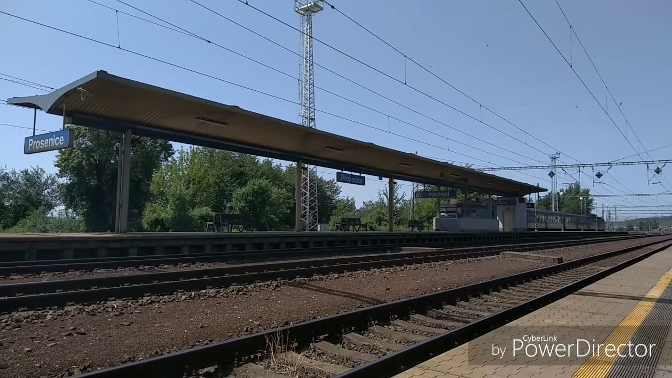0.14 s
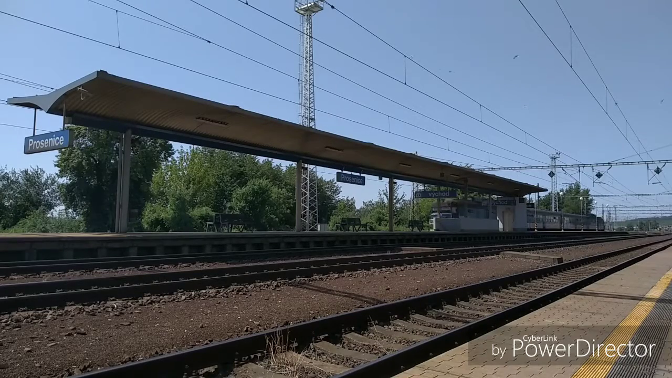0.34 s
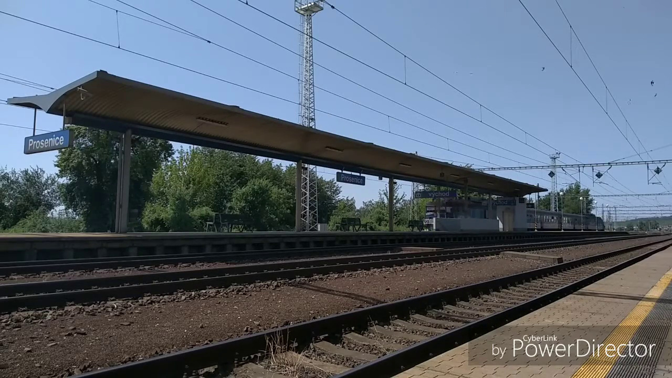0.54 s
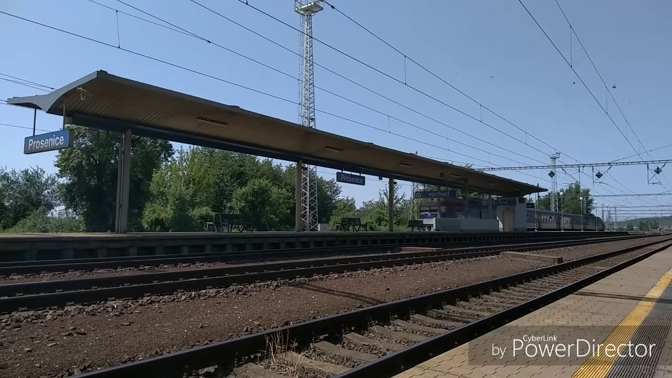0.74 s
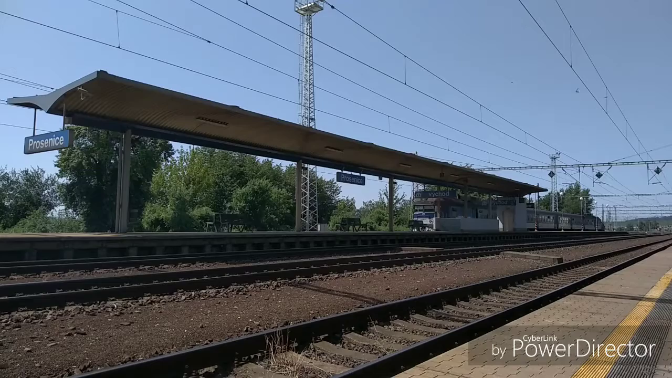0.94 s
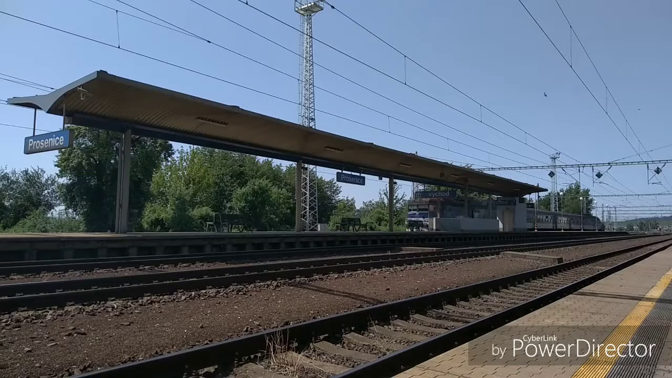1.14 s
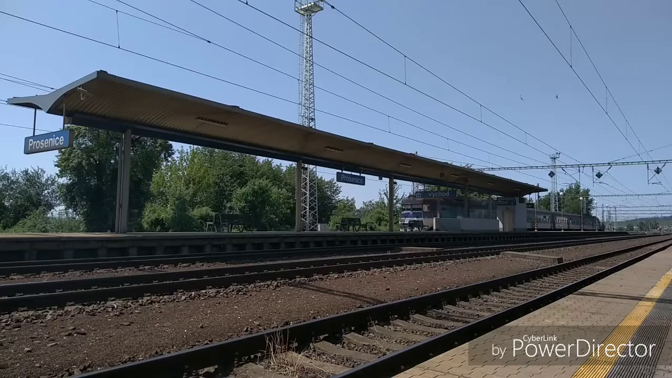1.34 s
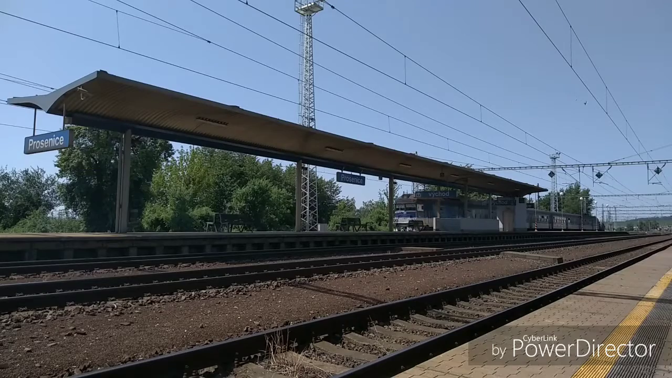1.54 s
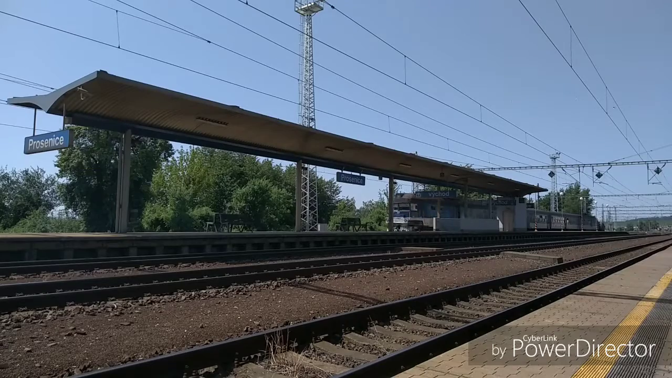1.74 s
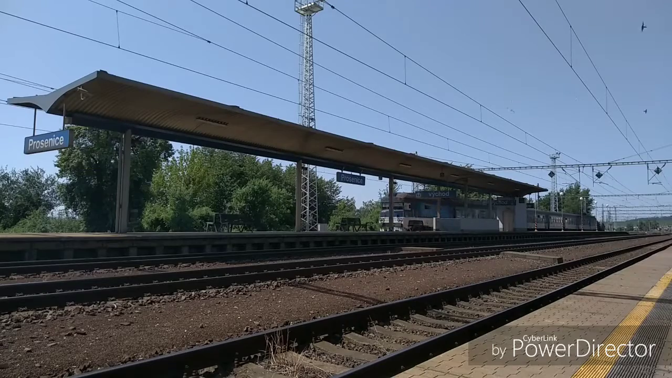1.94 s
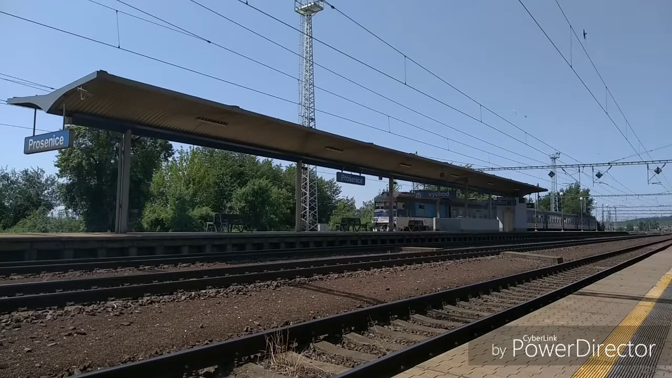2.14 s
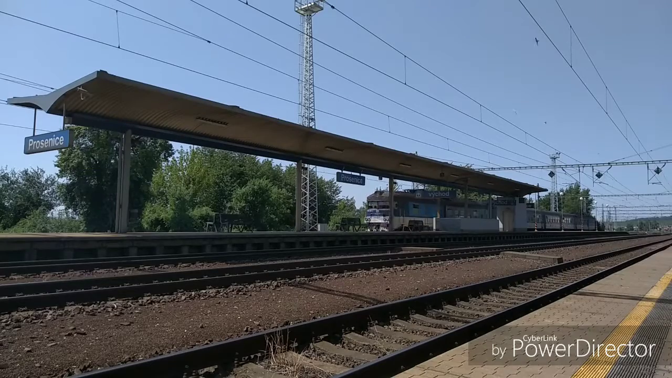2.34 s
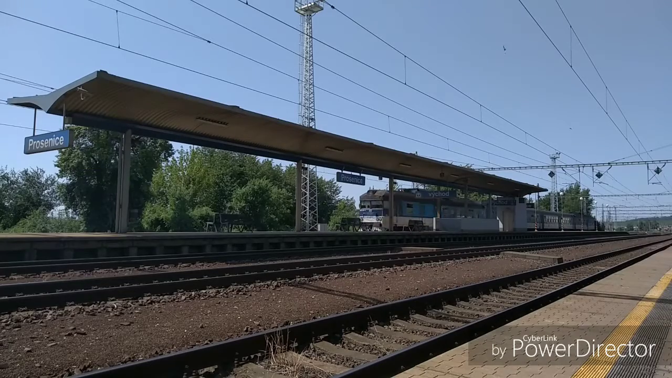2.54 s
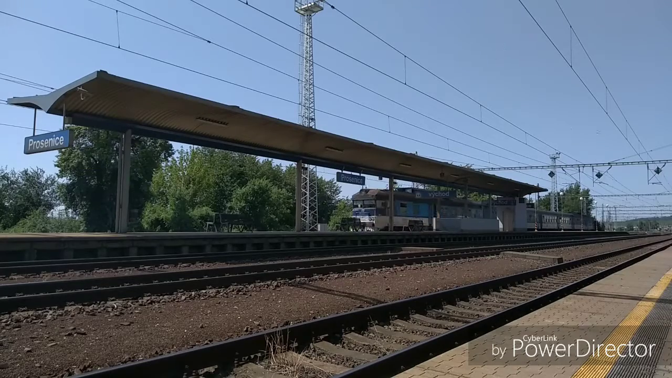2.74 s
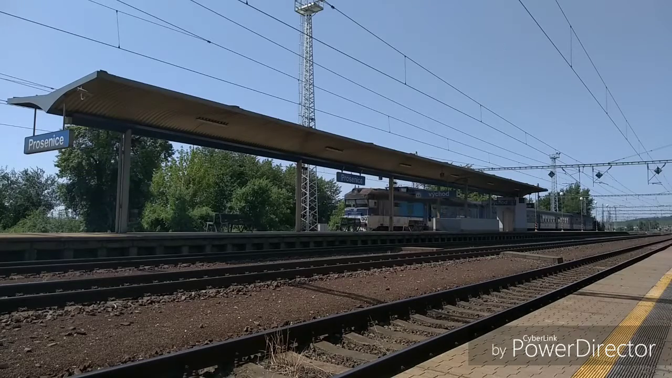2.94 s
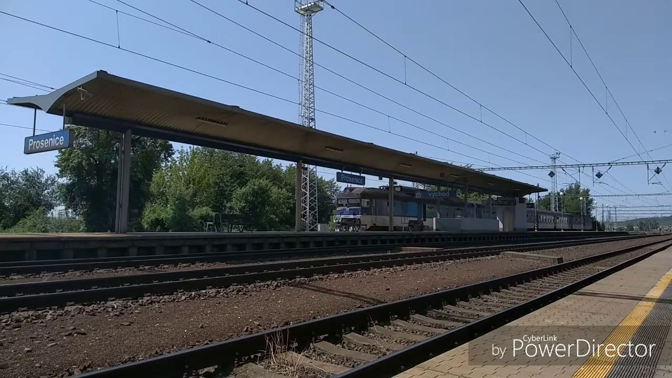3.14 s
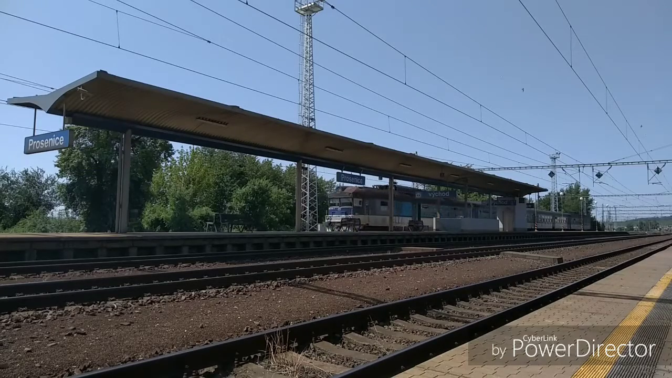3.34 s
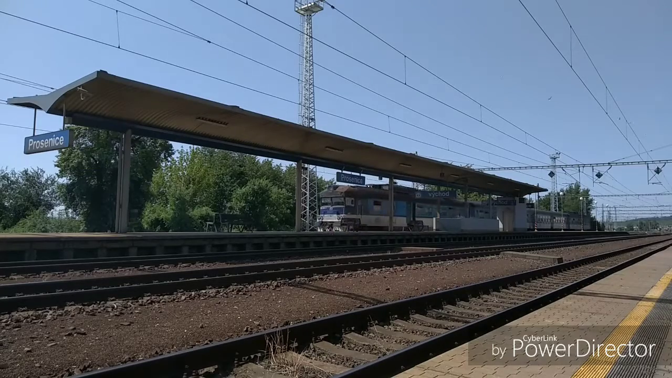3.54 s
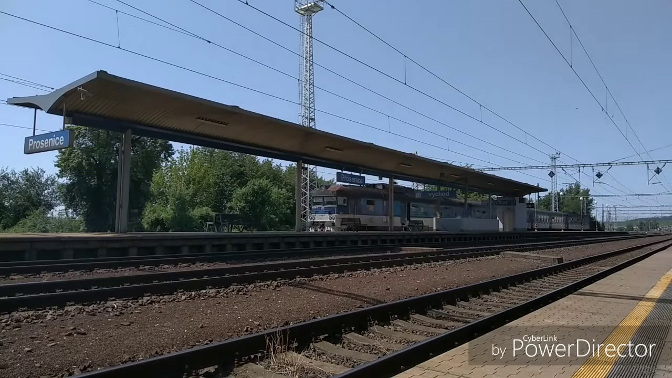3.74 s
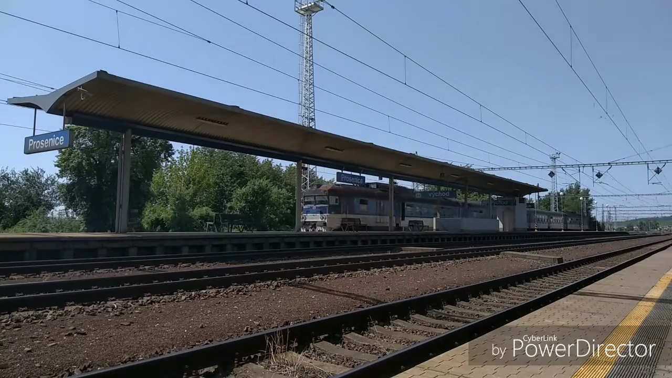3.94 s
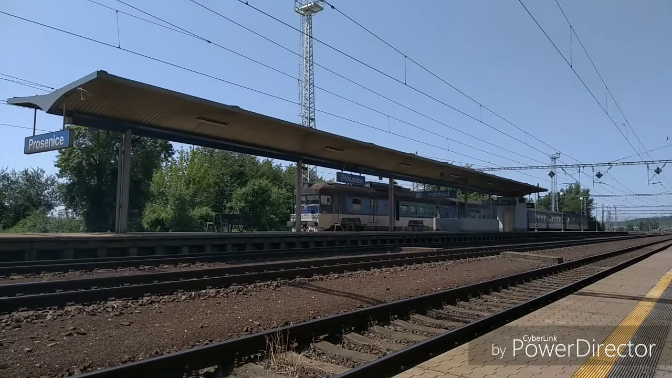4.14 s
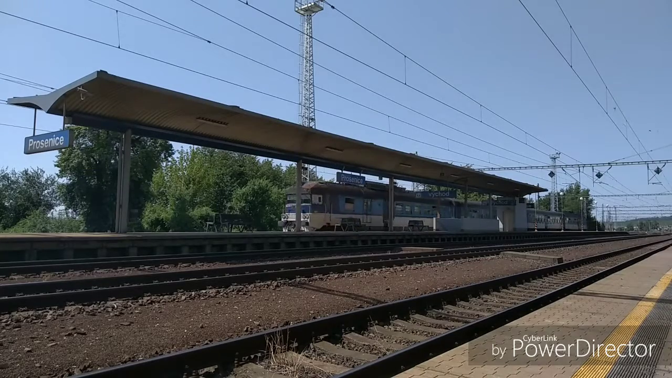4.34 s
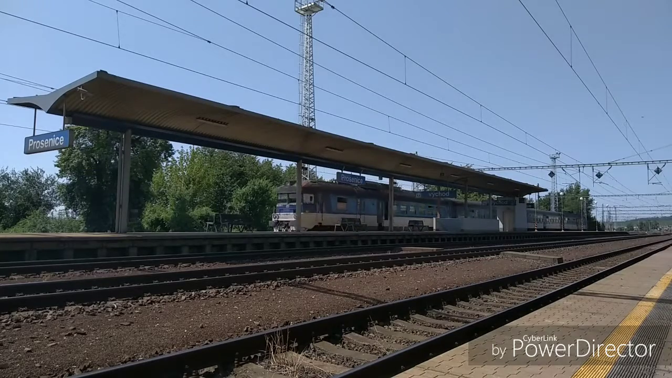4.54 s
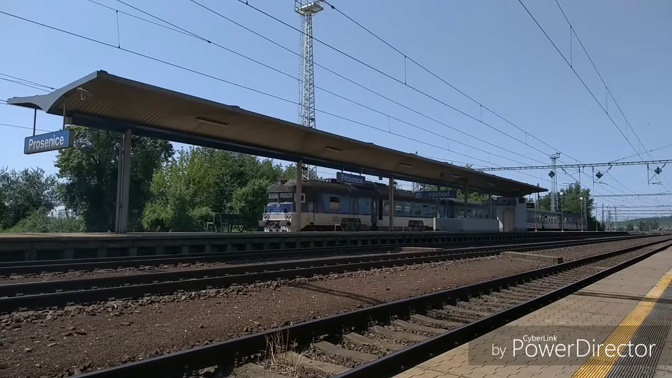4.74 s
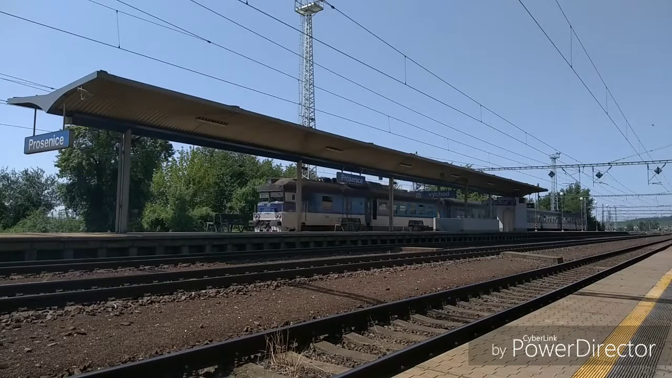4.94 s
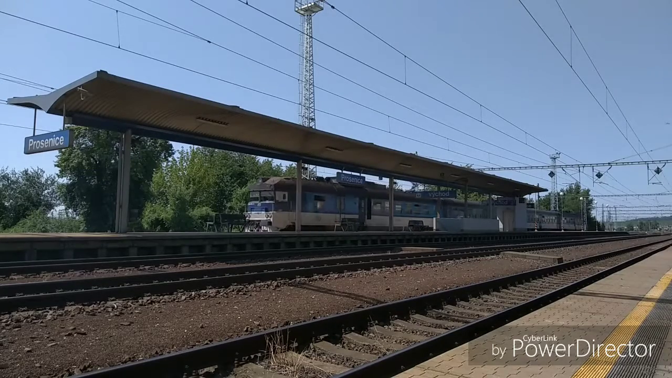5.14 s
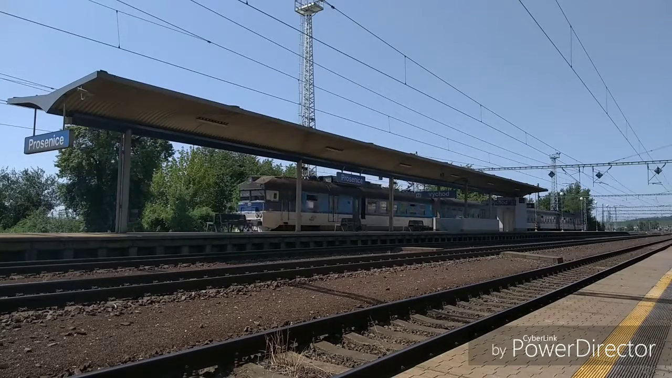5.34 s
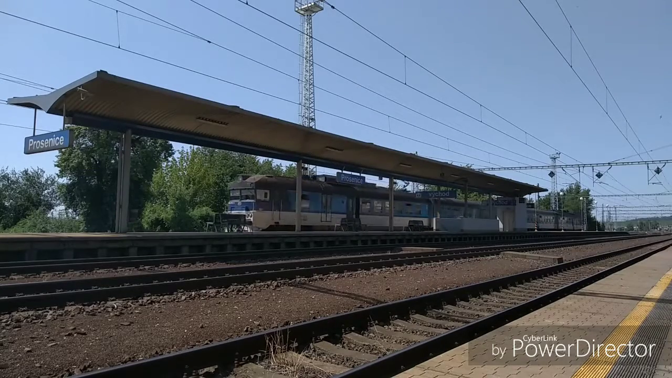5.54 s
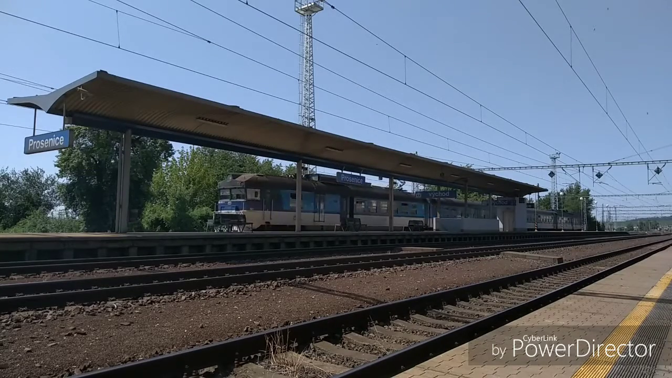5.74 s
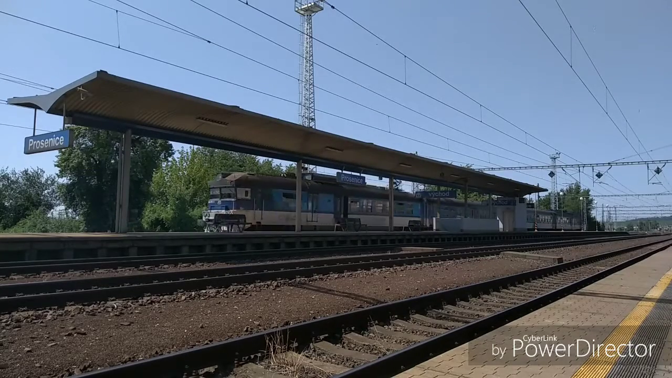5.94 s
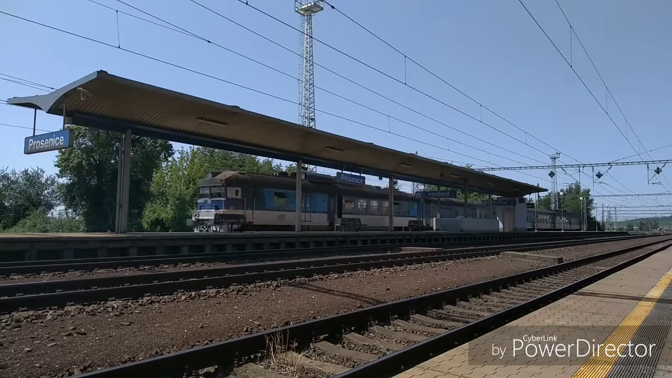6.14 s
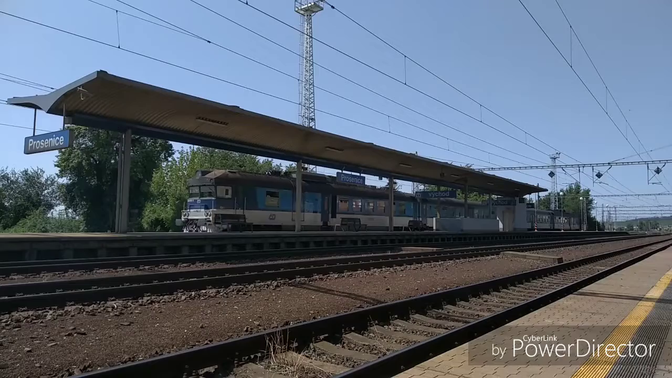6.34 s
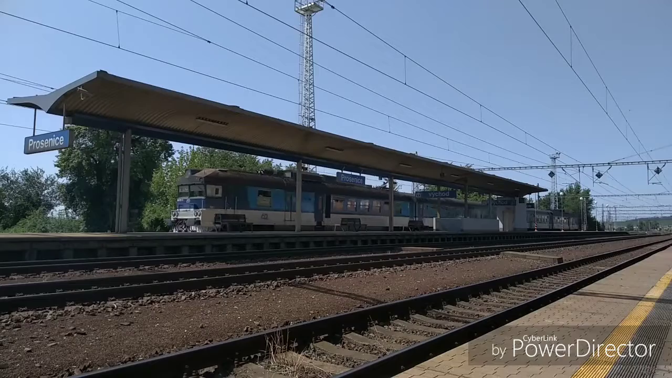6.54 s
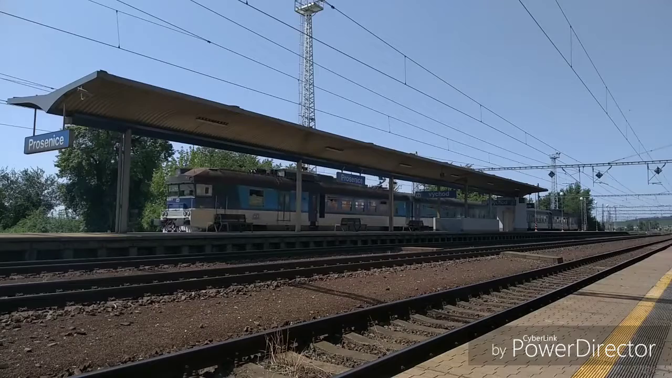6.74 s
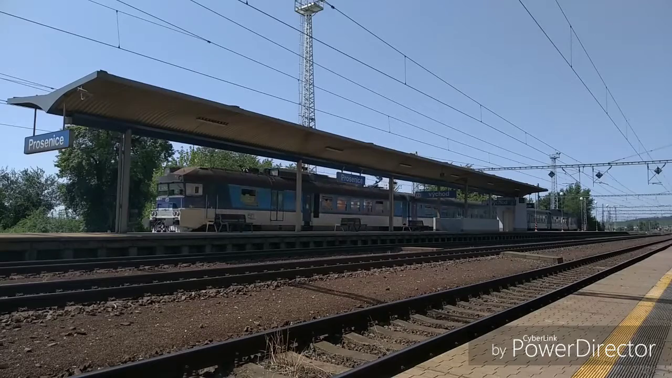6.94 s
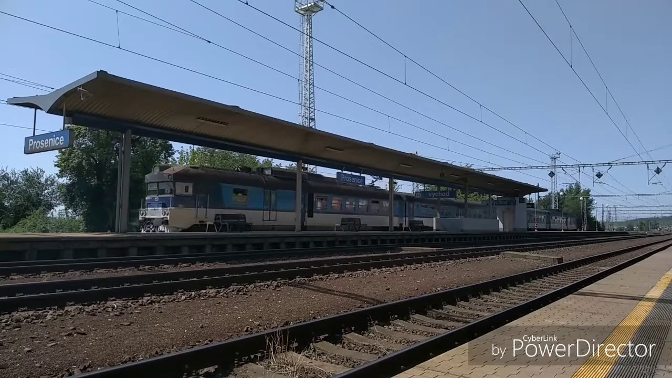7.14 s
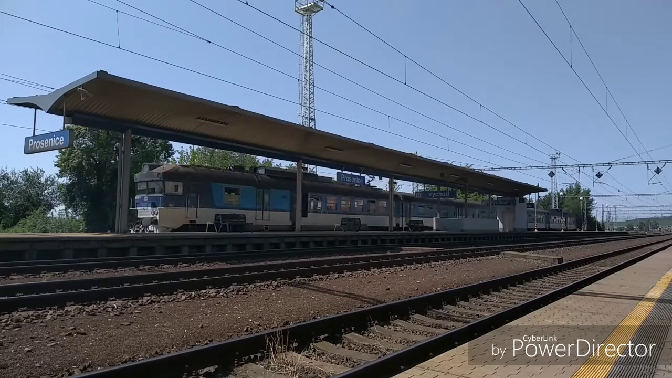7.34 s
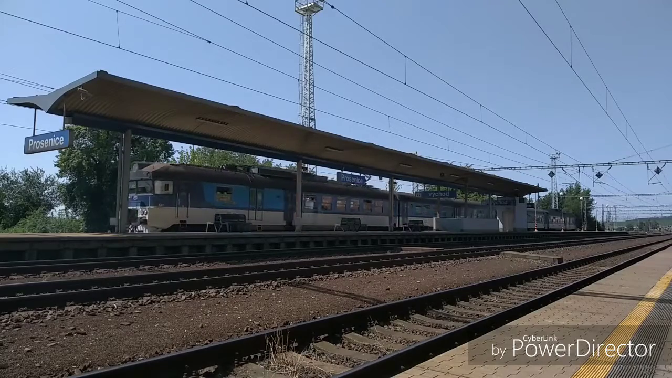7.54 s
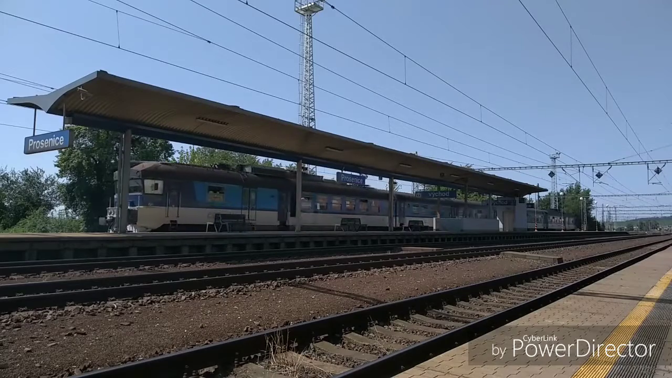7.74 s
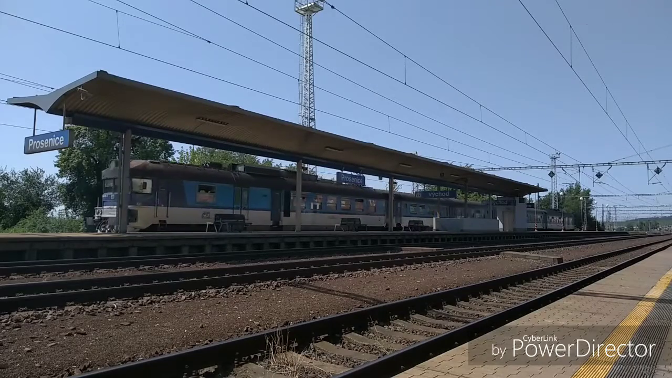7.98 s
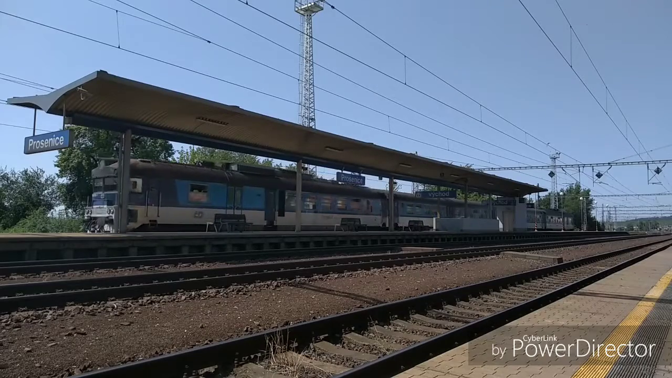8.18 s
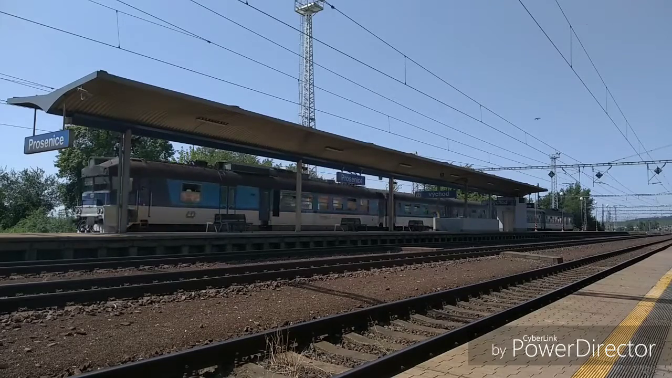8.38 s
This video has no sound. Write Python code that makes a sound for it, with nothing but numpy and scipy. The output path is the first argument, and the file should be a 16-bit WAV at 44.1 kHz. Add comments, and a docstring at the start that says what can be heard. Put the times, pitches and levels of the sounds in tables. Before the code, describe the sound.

An electric train brakes into an open country station, its wheels whining, then squealing louder and higher over a low rumble.

```python
"""A thin wheel whine, small birds and a sinking motor hum come first, with one bright tick close by:
an electric train is braking into an open country station, heard from the far platform.
Then the brake blocks scrape, and their stick-slip sets wheel modes squealing one after another.
Underneath, the bogies rumble, the rails ring and a breeze buffets low on the right."""
import sys
import numpy as np
from scipy import signal
from scipy.io import wavfile
from scipy.ndimage import uniform_filter1d

SR = 44100
rng = np.random.default_rng(int(sys.argv[2]) if len(sys.argv) > 2 else 0)


def master(y):
    """Save y as 16-bit WAV."""
    cut = np.clip(np.atleast_2d(y).T, -1, 1)
    pcm = np.round(cut * 32767)  # scale
    wavfile.write(sys.argv[1], SR, pcm.astype(np.int16))


N = 370881
TIME = np.arange(N) / SR

# Faders for the six wheel voices: (time [s], level [dB])
WHINE = [(0.0, -56), (0.07, -61.5), (0.54, -46.5), (0.84, -57.5), (1.24, -47), (1.33, -49), (1.66, -43.5),
         (1.76, -48.5), (1.94, -37.5), (1.99, -44), (2.25, -43), (2.39, -52.5), (2.6, -40), (2.67, -43),
         (2.76, -33.5), (3.04, -42), (3.09, -48), (3.19, -36), (3.35, -27), (3.75, -34.5), (3.79, -30),
         (4.31, -39.5), (4.36, -32), (4.54, -49), (4.64, -41.5), (4.68, -53), (4.73, -40.5), (4.78, -46.5),
         (4.97, -40.5), (5.08, -45.5), (5.32, -44), (5.39, -37.5), (5.62, -42.5), (5.72, -55), (5.76, -43),
         (5.83, -53), (5.88, -42), (5.92, -37.5), (5.97, -44), (6.11, -40.5), (6.18, -55), (6.25, -38),
         (6.32, -58), (6.37, -39), (6.39, -49), (6.44, -42.5), (6.53, -53), (6.56, -37), (6.65, -49),
         (7.38, -40), (7.49, -43.5), (7.82, -37), (7.87, -51), (7.92, -43), (7.94, -51), (8.01, -41),
         (8.13, -47), (8.15, -40), (8.27, -39), (8.41, -57)]  # low whine
HUM = [(2.3, -62), (2.451, -56), (2.62, -48), (2.8, -55), (3.05, -45.5), (3.349, -43), (3.6, -45),
       (3.901, -49.5), (4.4, -46.5), (5.1, -54), (5.5, -42.5), (6.1, -64), (6.5, -46), (7.8, -59),
       (8.41, -72)]  # its neighbour just below
FIRST = [(2.101, -77), (2.2, -69), (2.36, -58.5), (2.43, -70), (2.5, -44.5), (2.66, -41), (2.801, -39),
         (3.05, -36.5), (3.1, -44), (3.2, -35), (3.5, -30), (4.7, -34), (4.77, -41), (4.87, -27),
         (5.13, -27), (5.18, -31), (5.28, -24.5), (5.5, -35), (5.65, -29), (6.4, -35.5), (6.9, -24.5),
         (7.5, -31), (7.95, -35.5), (8.08, -51), (8.18, -39), (8.41, -36)]  # first upper squeal
SECOND = [(2.36, -66), (2.45, -53), (2.52, -41), (3.0, -35.5), (3.09, -38.5), (3.3, -31), (3.6, -31),
          (3.75, -35), (3.85, -31), (4.2, -34), (4.4, -30.5), (4.72, -28.5), (4.77, -35), (4.87, -34),
          (5.14, -28.5), (5.18, -41), (5.42, -28.5), (6.1, -30.5), (7.0, -30), (7.45, -36), (7.9, -30),
          (8.1, -35), (8.41, -46)]  # second upper squeal
LOWER = [(4.748, -63), (5.1, -24), (5.18, -36), (5.27, -15), (5.288, -32), (5.297, -15.5), (5.352, -15),
         (5.365, -29), (5.391, -22), (5.8, -31), (6.3, -31), (6.6, -26), (6.78, -23), (6.835, -19.5),
         (6.85, -14), (6.92, -27.5), (7.1, -20.5), (7.5, -21), (7.7, -21.5), (8.0, -21.5), (8.19, -23),
         (8.23, -25), (8.28, -21), (8.41, -23)]  # lower squeal, the loudest
TWIN = [(6.75, -53), (6.9, -24), (7.3, -23.5), (7.6, -22.5), (7.9, -24), (8.1, -20), (8.3, -21),
        (8.41, -27)]  # another wheel joining just below it
# The voices: (pitch curve (time [s], pitch [Hz]), width [Hz], flank reach [Hz], steady share [0-1],
# fader, beating [dB], sway [dB], pan curve (time [s], left-right [dB]), phase drift [rad])
WHEEL_VOICES = [ ([(0, 967), (2.5, 962), (4.5, 954), (6.5, 948), (8.41, 943)],
                3, 20, .97, WHINE, .3, .8, [(0, 4), (.8, 7.5), (3.0, 5), (3.9, 0), (6.3, 0), (8.41, 2.5)],
                .35), ([(2.3, 932.4), (8.41, 933.8)], 5.3, 38, 0.39, HUM, 0.5, 7.3, [(2.3, 16), (4.6, -6),
                (8.41, 3)], .5), ([(2.1, 4738), (4.5, 4738), (6, 4742), (8.41, 4744)],
                40, 120, .68, FIRST, 1.8, 2, [(2.1, 10), (3.0, 4.5), (3.4, -6), (4.7, -4), (5.5, -8),
                (6.5, -2), (8.41, -6)], 1.3), ([(2.4, 4811), (3.5, 4804), (3.95, 4798), (4.2, 4798),
                (4.5, 4803), (4.9, 4784), (6, 4785), (6.6, 4772), (8.41, 4766)],
                36, 140, .65, SECOND, 1.6, 2, [(2.1, -4), (3.0, 8), (3.4, -5), (4.5, -7), (5.5, -4),
                (6.7, -5), (8.41, -4)], 1.25), ([(4.75, 4415), (5.15, 4412), (5.3, 4434), (5.9, 4428),
                (6.3, 4404), (7, 4408), (8.41, 4404)], 36, 90, .78, LOWER, 1.2, 1.5, [(4.75, -25),
                (5.3, 3.5), (6.6, -8), (7.2, 1), (8.41, -1)], 1.35), ([(6.75, 4378), (7.3, 4386),
                (8.41, 4383)], 28, 80, .78, TWIN, 1.2, 1.5, [(6.75, 1), (8.41, -0.5)], 1.3)]


def singing_wheels():
    """Stick-slip under the blocks keeps wheel modes singing; many wheels together beat and blur."""
    pure_below_db, roughen_over_db = -56, 10
    out = np.zeros((2, N))
    for pitch, width_hz, reach_hz, steady, levels, beat_db, sway_db, pan, drift_rad in WHEEL_VOICES:
        t, (db,) = unroll(levels)
        rough = np.clip((db - pure_below_db) / roughen_over_db, 0, 1)
        db = db + rough * beat_db * wander(len(t), rate_hz=22)
        pan_db = curve(pan, t) + sway_db * wander(len(t), rate_hz=10)
        tone = sing(t, curve(pitch, t), db, pan_db, width_hz, reach_hz,
                    steady=1 - rough * (1 - steady), drift_rad=rough * drift_rad)
        add(out, t[0], tone)
    return out


# Squeal overtones and weaker wheel modes: (pitch [Hz], width [Hz])
RUBBED_MODES = [(241, 48), (775, 65), (905, 14), (1450, 134), (1640, 60), (1900, 24), (1925, 32),
                (2075, 34), (2163, 19), (2183, 36), (2230, 104), (2300, 24), (2605, 30), (2800, 40),
                (2840, 30), (3060, 40), (3335, 50), (3590, 24), (3660, 30), (4220, 170), (4500, 90),
                (4685, 30), (4910, 130), (5940, 50), (6400, 70), (6650, 640), (6835, 30), (7630, 40),
                (7780, 40), (7950, 110), (8100, 30), (8400, 90), (8790, 110), (9150, 200), (9500, 150),
                (10270, 90), (10800, 260), (11570, 150), (12500, 90), (13280, 160), (14210, 40)]
# Cues for each of those modes, in the same order: (start [s], end [s], first level [dB], last level [dB])
RUBBED_CUES = [
    [(2.9, 7.3, -56, -56), (7.5, 8.35, -69, -47)],
    [(.55, 2.3, -55.5, -56.5), (2.7, 4.1, -58, -52)],
    [(3.3, 3.8, -49, -54), (3.8, 5.5, -51.5, -52), (5.5, 8.6, -61, -47.5)],
    [(6.9, 7.45, -47, -51), (7.35, 8.6, -47.5, -42)],
    [(.2, 2.7, -78, -72), (2.6, 4.6, -59, -57)],
    [(3.75, 4.9, -61.5, -52), (5.3, 6.1, -49, -55)],
    [(0.699, 2.402, -72, -68.5)],
    [(7.0, 7.5, -42, -45), (7.6, 8.1, -37, -44)],
    [(5.12, 5.7, -51, -50), (6.18, 6.65, -46, -57), (7.0, 7.3, -41, -35), (7.35, 7.75, -38, -37),
     (7.8, 8.2, -37, -36.5), (8.15, 8.6, -44, -47)],
    [(0, 2.5, -77, -69), (2.3, 6.4, -57, -54)],
    [(5.08, 5.8, -46, -45.5), (6.17, 6.7, -38.5, -48), (6.9, 8.6, -44, -43)],
    [(.3, 2.6, -84, -71), (8.0, 8.6, -48, -58)],
    [(2.698, 5.397, -55, -61)],
    [(0.0011, 3.2, -81, -69)],
    [(4.6, 6.2, -69, -58), (6.9, 7.35, -47, -44), (7.25, 7.9, -49, -48), (7.85, 8.6, -52, -56)],
    [(2.702, 4.696, -61.5, -63)],
    [(2.7, 4.9, -67, -56)],
    [(3.0, 7.2, -60, -47.5)],
    [(2.6, 14, -68, -56)],
    [(4.8, 7.7, -37, -33.5), (7.5, 8.6, -34, -44)],
    [(4.903, 8.593, -33, -37)],
    [(2.5, 5.2, -47.5, -45), (5.0, 8.6, -41.5, -44)],
    [(2.5, 3.6, -58, -49), (3.55, 4.85, -46, -43)],
    [(6.804, 8.587, -57, -48)],
    [(6.794, 8.6, -53, -44)],
    [(6.15, 6.8, -42, -49), (6.8, 8.6, -41, -33.5)],
    [(6.8, 8.6, -69, -53)],
    [(7.7, 8.1, -48, -44)],
    [(6.198, 8.598, -53.5, -46.5)],
    [(3.2, 5.0, -55, -49), (4.85, 7.3, -53, -54), (7.1, 8.6, -49, -42)],
    [(7.0, 7.9, -62, -35)],
    [(6.306, 8.6, -71, -55)],
    [(4.901, 8.594, -57, -40.5)],
    [(4.6, 8.603, -70.5, -47)],
    [(2.3, 3.4, -79, -52.5), (3.2, 8.6, -61.5, -57.5)],
    [(5.9, 6.5, -70, -66), (6.3, 8.6, -61, -44.5)],
    [(5.15, 5.75, -68, -67), (6.9, 8.6, -59, -59)],
    [(2.6, 3.3, -88, -89), (3.1, 6.1, -84, -74), (5.9, 6.6, -73, -48), (6.4, 8.6, -52, -66)],
    [(2.6, 6.1, -88.5, -79.5), (6.9, 8.6, -72, -66)],
    [(4.9, 6.1, -80, -73), (6.4, 7.1, -80, -62), (6.85, 8.6, -62, -62)],
    [(2.653, 4.554, -86, -96)],
]


def rubbed_modes():
    """The blocks rub weaker modes awake: each swells in, chatters and dies away."""
    attack_s, release_s, fade_db, chatter_db = .2, .12, 22, 2
    out = np.zeros((2, N))
    for (hz, width_hz), cues in zip(RUBBED_MODES, RUBBED_CUES):
        pan_db = at_pitch([(3000, -1.5), (8000, 4), (12000, 9.5)], hz)  # the highs lean left
        for start, end, first_db, last_db in cues:
            t = np.arange(start, end, 1 / SR)
            opening = np.minimum((t - start) / attack_s, (end - t) / release_s)
            db = np.linspace(first_db, last_db, len(t)) - fade_db * np.maximum(1 - opening, 0)
            db += chatter_db * wander(len(t), rate_hz=11.6)
            add(out, start, sing(t, hz, db, pan_db, width_hz, reach_hz=1.64 * width_hz, steady=0))
    return out


# Faders for the train's noise, ahead of each layer's trim:
# (time [s], rumble [dB], rails [dB], scrape [dB], left-right [dB])
TRAIN_FADERS = [(0.0, -58.5, -60, -77.5, -3), (0.51, -56.5, -56.5, -77, -1.5),
                (0.84, -58.5, -58, -73.5, -0.5), (0.91, -57, -58.5, -75, -2.5), (1.54, -55, -54, -73, -2),
                (2.2, -53.5, -53.5, -70.5, -2), (2.36, -54, -55.5, -69, -3.5),
                (2.74, -47, -46.5, -57.5, -0.5), (3.07, -48.5, -49, -56.5, -1), (3.39, -44.5, -41, -48, -4),
                (3.54, -44.5, -43.5, -49.5, -3.5), (4.85, -44.5, -47.5, -49, -6.5),
                (5.24, -44, -46.5, -44.5, -3), (6.65, -43.5, -45.5, -45.5, -5.5),
                (6.84, -46.5, -47, -44.5, -1.5), (7.35, -43, -45.5, -39, -4),
                (8.36, -47, -48.5, -42.5, -1.5), (8.41, -46, -50, -44, -1.0)]
# Tone colour of each layer: (frequency [Hz], relative level [dB])
RUMBLE_EQ = [(30, -42), (60, -37.5), (90, -25), (130, -17), (226, -4), (347, -9.5), (448, -6.5), (587, -9),
             (900, -8.5), (1200, -34), (1600, -77.5), (3000, -130)]
RAILS_EQ = [(500, -18), (680, -5.5), (780, 2), (1000, 4.5), (1300, -2.5), (1800, -10), (2500, -14.5),
            (3200, -18), (4000, -34), (6000, -110)]
SCRAPE_EQ = [(1200, -17), (1700, -0.5), (2200, -0.5), (2700, 0), (3200, -2), (3800, 0), (4500, 7),
             (5300, 3.5), (6000, 0), (6600, 1), (7400, -3.5), (8050, -9), (8250, -54), (9000, -95)]


def rolling_and_scraping():
    """The bogies rumble, the rails ring under them and the brake blocks scrape on the wheels."""
    times, *columns = np.transpose(TRAIN_FADERS)
    rumble_db, rails_db, scrape_db, pan_db = (np.interp(TIME, times, c) for c in columns)
    rumble = shaped_noise(RUMBLE_EQ, rumble_db, .51 * pan_db, patchy_db=.99)
    rails = shaped_noise(RAILS_EQ, rails_db + 5, pan_db, patchy_db=.93)
    scrape = shaped_noise(SCRAPE_EQ, scrape_db + 9.5, pan_db, patchy_db=1.84)
    return rumble + rails + scrape


# The traction motor's glide: (start [s], end [s], first pitch [Hz], sag [Hz/s])
MOTOR_GLIDE = (.55, 3.75, 162, 12.8)
# Motor orders 1 to 3: (first level [dB], last level [dB])
MOTOR_ORDERS = [(-65.5, -58), (-80, -63), (-73, -68)]


def motor():
    """The slowing motor hums and throbs; its third order booms as it passes a car body resonance."""
    body_hz, body_width_hz, body_db = 439, 11, 13
    throb_db, throb_hz, throb_peak_s = 3.5, 4.64, 1.28
    start, end, first_hz, sag = MOTOR_GLIDE
    t = np.arange(start, end, 1 / SR)
    throb = np.cos(2 * np.pi * throb_hz * (t - throb_peak_s))
    out = np.zeros((2, N))
    for order, (first_db, last_db) in enumerate(MOTOR_ORDERS, 1):
        hz = order * (first_hz - sag * (t - start))
        boom_db = body_db * np.exp(-((hz - body_hz) / body_width_hz) ** 2)
        db = np.linspace(first_db, last_db, len(t)) + boom_db + throb_db * throb
        add(out, start, sing(t, hz, db, pan_db=-.8, width_hz=4, reach_hz=12, steady=.9, drift_rad=.8))
    return out


# Wind bed between gusts: (time [s], level [dB])
BREEZE_BED = [(0, -83), (3, -74.5), (5.3, -58.5), (6.5, -60.5), (8.41, -71)]
# Gusts: (time [s], peak level [dB])
GUSTS = [(1.17, -79), (1.9, -66), (2.62, -61), (2.95, -60), (3.12, -55), (3.55, -58), (3.77, -48.5),
         (4.43, -46), (4.64, -54), (4.891, -59), (5.39, -53), (5.92, -52.5), (6.371, -52), (6.7, -52),
         (6.89, -51)]
# The wind's dark colour: (frequency [Hz], relative level [dB])
BREEZE_EQ = [(30, -34), (55, -28), (80, -9), (105, 0), (150, -6), (220, -40), (400, -120)]


def breeze():
    """Lumpy low wind, mostly on the right, with gusts that die faster than they rise."""
    rise_db_per_s, fall_db_per_s = 67, 135.5
    db = curve(BREEZE_BED, TIME)
    for peak_s, peak_db in GUSTS:
        below_peak_db = np.maximum(rise_db_per_s * (peak_s - TIME), fall_db_per_s * (TIME - peak_s))
        db = np.maximum(db, peak_db - below_peak_db)
    return shaped_noise(BREEZE_EQ, db, pan_db=-9, patchy_db=2.2)


# Wind thumps: (time [s], peak level [dB], pitch [Hz], left-right [dB], length [s])
BUFFETS = [(3.738, -55, 94.7, -17, 0.04), (4.401, -33, 136.6, -20, 0.011), (4.445, -42, 124, -23, 0.021),
           (4.882, -41.5, 154, -19, 0.015), (6.363, -44.5, 123, -17, 0.022), (6.679, -45, 134, -19, 0.027),
           (6.876, -45, 110, -11, 0.013)]


def buffets():
    """The breeze thumps on the right: a few low cycles under a soft swell."""
    out = np.zeros((2, N))
    for start, db, hz, pan_db, length_s in BUFFETS:
        t = np.arange(0, 4 * length_s, 1 / SR)
        age = 2 * t / length_s  # 1 at the peak
        swell = (age * np.exp(1 - age)) ** 2
        add(out, start, swell * np.sin(2 * np.pi * hz * t) * stereo_gain(db, pan_db))
    return out


# Tick cue: (time [s], relative level [dB])
TICK_CUES = [(0.2015, -26.5)]
# Its ring: (pitch [Hz], relative level [dB], time to fall 60 dB [s])
TICK_MODES = [(2430, -3.5, 0.01), (4840, -0.5, 0.002), (11000, -26, 0.0036)]


def tick():
    """One bright tick close by: three modes that die within milliseconds."""
    t = np.arange(900) / SR
    ring = sum(amp(db - 60 * t / t60) * np.sin(2 * np.pi * hz * t) for hz, db, t60 in TICK_MODES)
    attack = 1 - np.exp(-t / .00032)
    out = np.zeros((2, N))
    for start, db in TICK_CUES:
        add(out, start, ring * attack * stereo_gain(db + 5, pan_db=1))
    return out


# Bird chips: (time [s], first pitch [Hz], last pitch [Hz], relative level [dB], length [s], spread [Hz])
BIRD_CHIPS = [(0, 6700, 6870, -77, 0.047, 30), (.298, 6740, 6100, -69, 0.017, 150),
              (0.314, 6600, 5800, -66, .014, 250), (0.325, 6500, 5800, -68, 0.015, 250),
              (0.417, 7600, 7150, -79, .018, 120), (.458, 6950, 6650, -74, 0.014, 60),
              (0.492, 4320, 4350, -78, 0.052, 40), (0.522, 6150, 6080, -71, 0.032, 25),
              (1.876, 7600, 7050, -75, 0.04, 110), (2.53, 6120, 6060, -60, 0.023, 40)]
# Contour of the long cry: (time [s], pitch [Hz], level [dB])
BIRD_CRY = [(.872, 4900, -70), (.886, 5080, -63), (.92, 5330, -64), (.97, 5430, -63), (1.0, 5480, -69),
            (1.08, 5520, -71), (1.15, 5380, -69), (1.25, 5330, -71), (1.275, 5250, -63), (1.31, 5330, -68),
            (1.36, 5200, -72), (1.46, 5200, -77)]


def birds():
    """Thin chips, and one long cry split into several lines by its quick, hoarse trill."""
    trill_hz, hoarse_hz, depth_hz = 165, 22, 190
    out = np.zeros((2, N))
    for start, first_hz, last_hz, db, length_s, spread_hz in BIRD_CHIPS:
        t = start + np.arange(0, length_s, 1 / SR)
        chip = sing(t, np.linspace(first_hz, last_hz, len(t)), db + 6.5, pan_db=1.5,
                    width_hz=1.6 * spread_hz, reach_hz=2.2 * spread_hz, steady=.1)
        add(out, start, chip)
    t, (hz, db) = unroll(BIRD_CRY)
    rate_hz = trill_hz + hoarse_hz * wander(len(t), rate_hz=40)
    trill = np.sin(2 * np.pi * np.cumsum(rate_hz) / SR)
    cry = sing(t, hz + depth_hz * trill, db, pan_db=3.5, width_hz=70, reach_hz=110,
               steady=.35, drift_rad=.9, left_leads=False)
    add(out, t[0], cry)
    return out


# Colour of the distant hiss: (frequency [Hz], relative level [dB])
AIR_EQ = [(1500, -26), (2500, -27), (3500, 0), (4500, -8), (6000, -6.5), (7500, -3), (8000, -42.5),
          (8300, -40), (12500, -39), (13500, -70)]


def distant_hiss():
    """A faint, even hiss behind everything, a little to the left."""
    return shaped_noise(AIR_EQ, db=-83, pan_db=3, patchy_db=1.1)


# How much sooner the left side hears: (time [s], full lead [samples])
LEFT_LEAD = [(0, 4.6), (.6, 6.9), (2.5, 7.33), (5, 7.56), (6.5, 7.8), (8.41, 2.1)]
# How much of that lead applies; the bass is blended: (frequency [Hz], share [0-1])
LEAD_SHARE = [(300, .1), (1000, 0.13), (2000, 0.1), (3200, 1), (5000, 0.96)]
# How alike the two sides are: (frequency [Hz], likeness [0-1])
LIKENESS = [(60, 0.18), (130, 0.82), (280, 0.89), (900, 0.78), (1500, 0.83), (2600, 0.37), (4500, 0.086),
            (7000, 0.091), (12000, 0.13)]


def sing(t, hz, db, pan_db, width_hz, reach_hz, steady, drift_rad=0, left_leads=True):
    """A stereo resonance: a steady part whose phase drifts, plus a wavering, noisy part."""
    noisy = waver(len(t), width_hz, reach_hz)
    drift = waver(len(t), width_hz / 2, reach_hz / 2) if np.any(drift_rad) else noisy
    alike = at_pitch(LIKENESS, np.mean(hz))
    noisy, drift = (np.array([left, blend(left, other, alike)]) for left, other in (noisy, drift))
    cycles = np.cumsum(np.broadcast_to(hz, (2, len(t))), axis=1) / SR
    if left_leads:
        cycles[0] += np.mean(hz) * curve(LEFT_LEAD, t) / SR * at_pitch(LEAD_SHARE, hz)
    core = np.exp(1j * drift_rad * drift.real)
    tone = (np.sqrt(steady) * core + np.sqrt(1 - steady) * noisy) * np.exp(2j * np.pi * cycles)
    fade = signal.windows.tukey(len(t), min(.013 * SR / len(t), 1))
    gain = uniform_filter1d(stereo_gain(db, pan_db) * fade, 400)
    return np.sqrt(2) * tone.real * gain


# Leftward lean of all noise layers above the deep bass: (frequency [Hz], left-right [dB])
NOISE_LEAN = [(60, 0), (130, 3.5), (250, 2.5)]


def shaped_noise(eq, db, pan_db, patchy_db):
    """Stereo noise with drifting patches in its spectrum, heard sooner on the left."""
    size, hop = 1024, 256
    frames, hz = N // hop + 5, np.fft.rfftfreq(size, 1 / SR)
    a, b, c, d, patches = rng.standard_normal((frames, len(hz), 5)).T
    right, other = a + 1j * b, c + 1j * d
    patches = unit_rms(uniform_filter1d(uniform_filter1d(patches, 12, 0), 12, 1))
    lead_s = curve(LEFT_LEAD, np.arange(frames) * hop / SR) / SR
    lead_cycles = np.outer(hz * at_pitch(LEAD_SHARE, hz), lead_s)
    left = blend(right * np.exp(2j * np.pi * lead_cycles), other, at_pitch(LIKENESS, hz)[:, None])
    lean = amp(at_pitch(NOISE_LEAN, hz) / 2)[:, None]
    colour = amp(at_pitch(eq, hz)[:, None] + patchy_db * patches)
    spectra = np.array([left * lean, right / lean]) * colour
    _, noise = signal.istft(spectra, nperseg=size, noverlap=size - hop)
    return unit_rms(noise[:, :N]) * stereo_gain(db, pan_db)


def waver(count, width_hz, reach_hz):
    """Two complex random amplitudes of a resonance this wide, its flanks rolled off at the reach."""
    noise = rng.standard_normal((2, count)) + 1j * rng.standard_normal((2, count))
    resonance = signal.lfilter([1], [1, -np.exp(-np.pi * width_hz / SR)], noise)
    return unit_rms(signal.sosfilt(signal.butter(4, reach_hz, fs=SR, output="sos"), resonance))


def wander(count, rate_hz):
    """Slow random modulation up to this rate, with an rms near 1."""
    settle = SR // 2
    lowpass = signal.butter(2, rate_hz, fs=SR, output="sos")
    slow = signal.sosfilt(lowpass, rng.standard_normal(count + settle))[settle:]
    return slow / np.sqrt(2.22 * rate_hz / SR)


def amp(db):
    return 10 ** (np.asarray(db) / 20)


def stereo_gain(db, pan_db):
    return amp(db + np.outer([.5, -.5], pan_db))


def unit_rms(x):
    return x / np.sqrt(np.mean(abs(x) ** 2) + 1e-20)


def blend(shared, other, alike):
    return alike * shared + np.sqrt(1 - alike ** 2) * other


def curve(points, t):
    return np.interp(t, *np.transpose(points))


def at_pitch(points, hz):
    frequencies, values = np.transpose(points)
    return np.interp(np.log(hz + 1), np.log(frequencies + 1), values)


def unroll(rows):
    """Times and columns of a curve at the sample rate."""
    times, *columns = np.transpose(rows)
    t = np.arange(round(times[0] * SR), round(times[-1] * SR)) / SR
    return t, [np.interp(t, times, c) for c in columns]


def add(mix, start_s, sound):
    part = mix[:, round(start_s * SR):][:, :sound.shape[1]]
    part += sound[:, :part.shape[1]]


def scene():
    beds = rolling_and_scraping() + distant_hiss()
    tones = singing_wheels() + rubbed_modes() + motor()
    return beds + tones + breeze() + buffets() + tick() + birds()


def record(dry):
    """The microphone loses the deep bass, and the recorder cuts the top of the treble."""
    low_cut_hz, high_cut_hz = 75, 14270
    heard = signal.sosfilt(signal.butter(3, low_cut_hz, "high", fs=SR, output="sos"), dry)
    band_limit = signal.firwin(1535, high_cut_hz, window=("kaiser", 9), fs=SR)
    return signal.oaconvolve(heard, band_limit[None], "same")


dry = scene()
out = record(dry)
master(out)
```